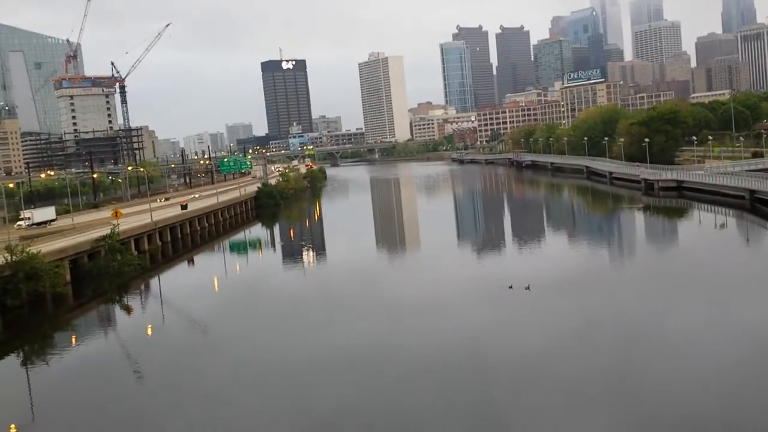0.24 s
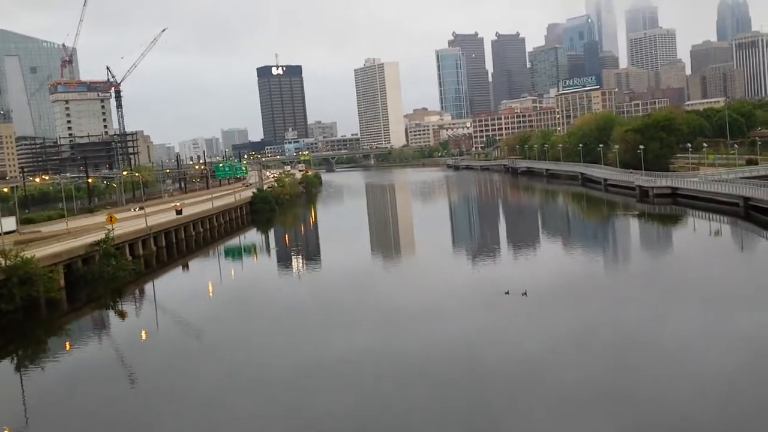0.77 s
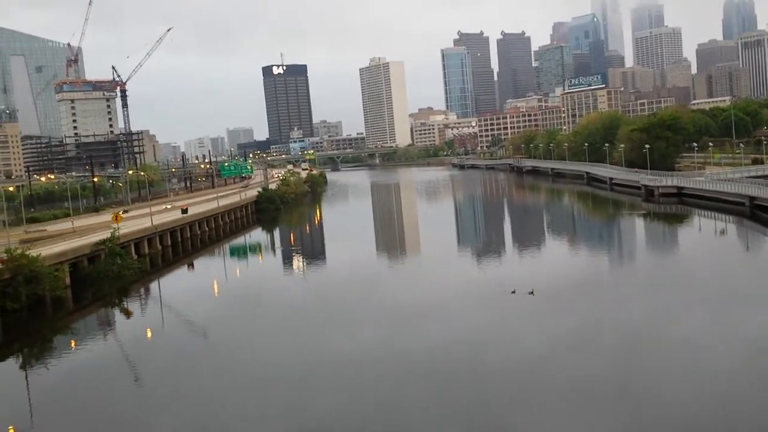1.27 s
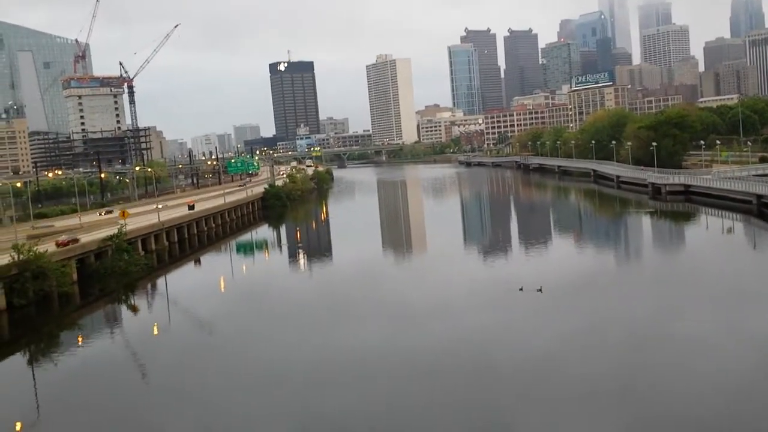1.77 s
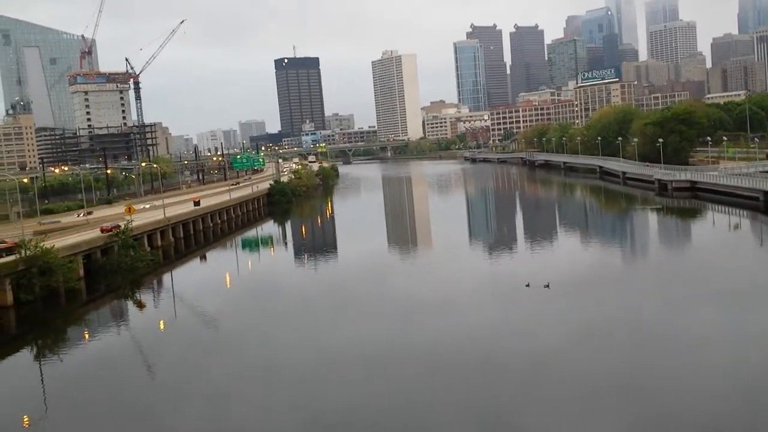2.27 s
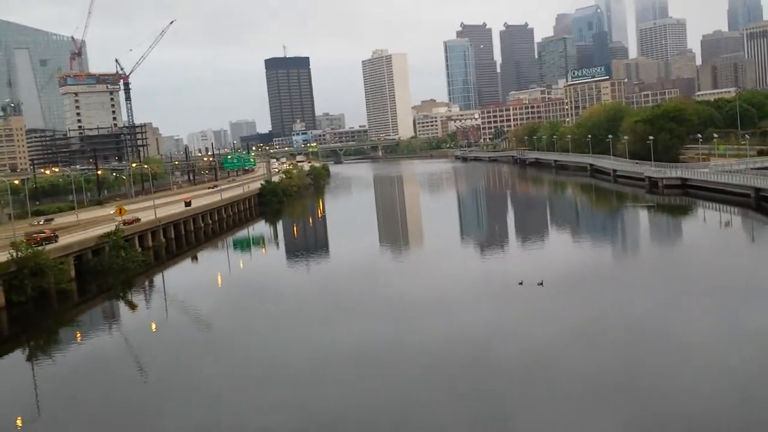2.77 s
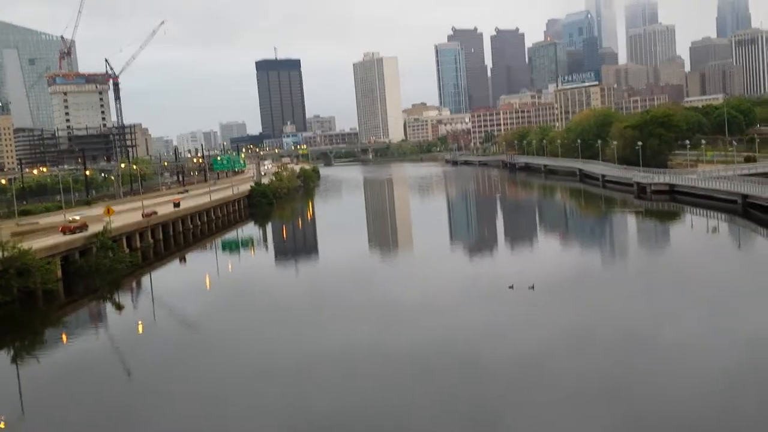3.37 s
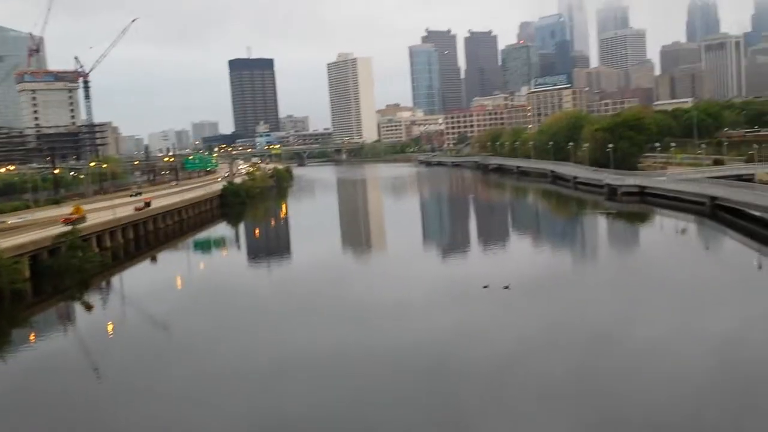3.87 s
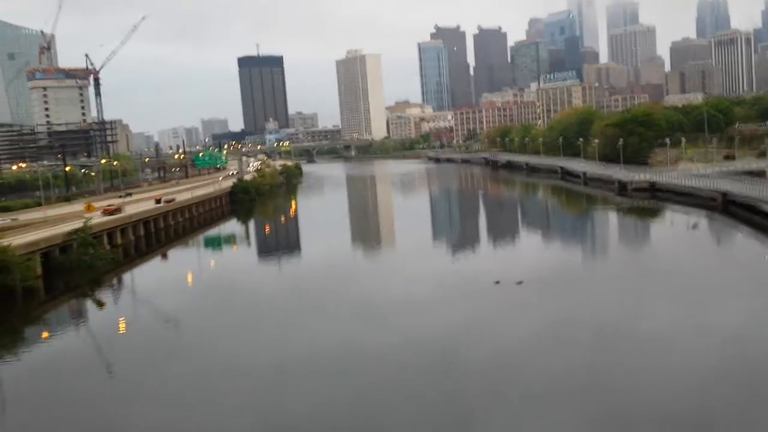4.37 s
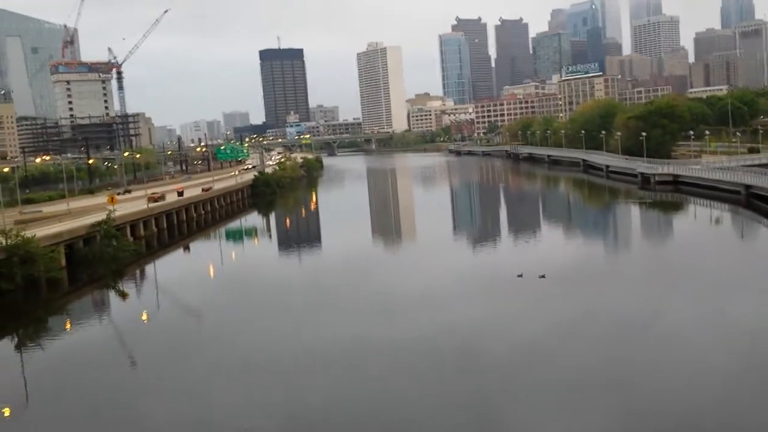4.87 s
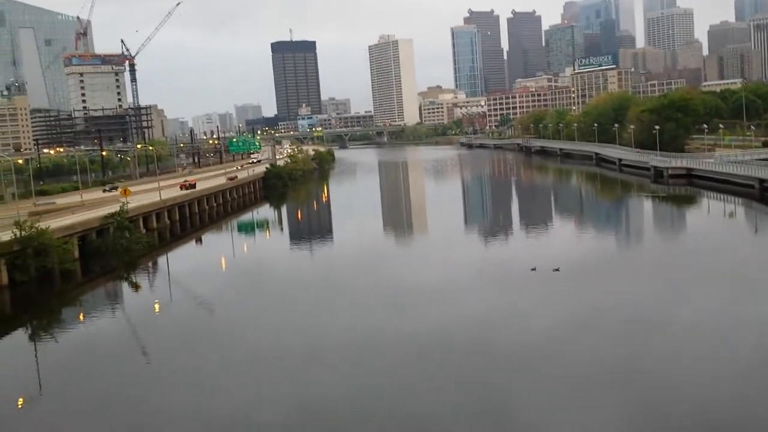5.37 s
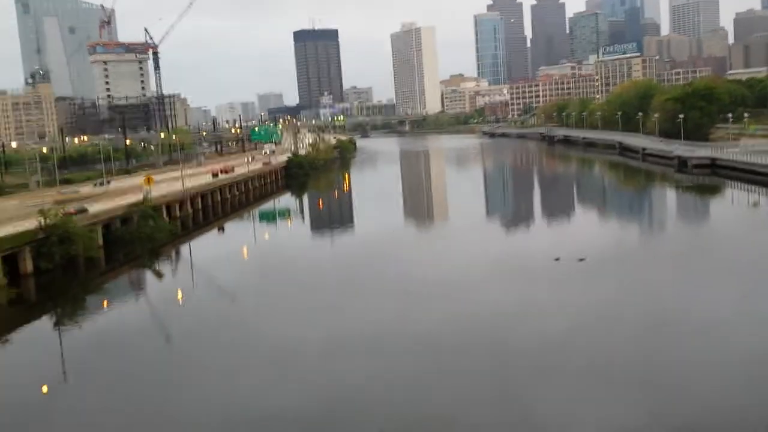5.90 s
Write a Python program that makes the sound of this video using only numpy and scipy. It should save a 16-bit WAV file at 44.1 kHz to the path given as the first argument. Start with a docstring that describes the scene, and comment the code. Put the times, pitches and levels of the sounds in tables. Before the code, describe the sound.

Steady roar and low rumble of highway traffic beside a river, a truck passing early, wet tyre hiss fading, axles thudding on a joint.

```python
"""On a bridge above a busy riverside highway, two microphone ports 13 cm apart. From the start, shaped noise
makes the tyre roar, engine rumble and droning resonances, while wet hiss sinks in surges. A truck is closest
at 1 s, its noise falling with distance; whining treads and engine notes are gliding tones, the whines gone
by about 3 s. Throughout, axles knock on an expansion joint: thud, ring and faint wash, mostly in pairs.
After 4 s a few thin squeaks, short wavering tones, come from far off."""
import sys
import numpy as np
from scipy import signal
from scipy.fft import rfft, irfft, next_fast_len
from scipy.io import wavfile
from scipy.ndimage import uniform_filter1d

SR = 44100
rng = np.random.default_rng(int(sys.argv[2]) if len(sys.argv) > 2 else 0)


def log_audio(samples):
    """Write samples as a 16-bit WAV file to the path given in sys.argv[1]."""
    # one column per channel
    frames = np.atleast_2d(samples).T
    # limit to full scale, then quantise
    limited = np.clip(frames, -1, 1)
    pcm = np.round(limited * 32767).astype(np.int16)
    wavfile.write(sys.argv[1], SR, pcm)


N = 270774
TIME = np.arange(N) / SR


# Spectrum of the tyre roar up on the bridge. Each row: frequency in Hz, relative density in dB.
ROAR_SPECTRUM = [(200, -16), (380, -4), (470, -2.5), (620, -3), (800, 1.2), (880, -1), (1000, 1),
                 (1450, -1.5), (1660, -8.5), (1850, -6.5), (2200, -9.5), (3000, -17.5), (4200, -25.5),
                 (9000, -64.5), (10500, -93)]
# The roar as cars come and go. Each row: time in seconds, level in dB before the overall lift,
# upper part against the lower in dB.
ROAR_COURSE = [(0, -27.5, -7.5), (0.9, -28, -5.5), (2.1, -25.5, -8), (2.6, -25.5, -9.5), (3.3, -25.5, -7.5),
               (4, -27, -6.5), (4.7, -26, -8.5), (5.5, -26, -8.5), (6.14, -27.5, -9)]
# Echo off a hard surface: its delay grows, and its ripple strengthens e-fold in BOUNCE_GROWTH_S.
BOUNCE_MS, BOUNCE_MS_PER_S, BOUNCE_END_DB, BOUNCE_GROWTH_S = 3.17, 0.15, 3, 1.9


def tyre_roar(lift_db=2.0, patchy_db=0.5, flutter_db=0.5, usual_upper_db=-7.5, banded_db=1.0,
              right_db=0.4, comb_top_hz=1500):
    """Tread noise of all lanes; an echo combs it, and its upper part changes with the mix of cars."""
    t, hz = grid(size=2048)
    upper = read([(1300, 0), (2000, 1)], hz)
    field_db = read(ROAR_SPECTRUM, hz) + upper * (follow(ROAR_COURSE, t)[1] - usual_upper_db)
    # the echo ripples the spectrum, less at the bottom and hardly above comb_top_hz
    delay_ms = BOUNCE_MS + BOUNCE_MS_PER_S * t
    comb = np.cos(2 * np.pi * hz * delay_ms / 1000)
    depth_db = BOUNCE_END_DB * np.exp((t - TIME[-1]) / BOUNCE_GROWTH_S)
    comb_range = read([(400, .3), (700, 1)], hz) * np.exp(-(hz / comb_top_hz) ** 4)
    field_db = field_db + depth_db * comb * comb_range
    field_db = field_db + patchy_db * patches(t, hz, .16, 130) + banded_db * patches(t, hz, 0.88, 70)
    swell_db = follow(ROAR_COURSE, TIME)[0] + flutter_db * wander(22)
    side_db = np.array([[-right_db], [right_db]]) / 2
    return outdoor_noise(field_db, hz, direct=0.39) * gain_of(swell_db + lift_db + side_db)


# Deep rumble of the city and all engines. Each row: frequency in Hz, relative density in dB.
RUMBLE_SPECTRUM = [(20, -60.5), (27, -35), (34, -16), (42, 1.5), (60, -3.5), (75, -3), (100, 0.5),
                   (140, -3), (200, -1.5), (330, -7.5), (450, -8), (800, -70), (2000, -100)]
# heavy vehicles draw away, so the engines fade steadily against the deepest rumble
ENGINE_START_DB, ENGINE_FADE_DB_PER_S = 2.5, 0.88


def engines(level_db=-27.0, patchy_db=0.35):
    """The blended rumble of many engines; its deepest part, from the whole city, stays steady."""
    t, hz = grid(size=8192)
    nearby = read([(55, 0), (110, 1)], hz)
    engine_db = ENGINE_START_DB - ENGINE_FADE_DB_PER_S * t
    field_db = read(RUMBLE_SPECTRUM, hz) + nearby * engine_db + patchy_db * patches(t, hz, .25, 40)
    return outdoor_noise(field_db, hz, direct=0.23) * gain_of(level_db)


def resonance(hz, centre_hz, width_hz, db):
    """The power spectrum of one resonance."""
    return gain_of(db) ** 2 / (1 + 2 * ((hz - centre_hz) / width_hz) ** 2) ** 2


# Steady resonances of the heavy vehicles. Each row: centre in Hz, width in Hz, relative level in dB.
DRONE_RESONANCES = [(246.6, 53, 0), (294, 43, -10), (191, 14, -10)]
# Vehicles that boom beside the drone as they pass. Each row: time of the top in seconds, centre in Hz,
# width in Hz, relative level in dB, bell spread in seconds.
PASSING_BOOMS = [(0.7, 289, 27.8, 0.5, 0.25), (1.3, 290, 50, -2.5, .3), (1.947, 310, 54.7, -1.5, 0.4),
                 (2.1, 169, 28, -2, 0.5), (3.397, 316, 44.8, -2, .3), (5.898, 180, 30, 0.5, 0.31)]
# Swells and lulls of the drone. Each row: middle in seconds, change in dB, bell spread in seconds.
DRONE_SWELLS = [(1.55, 0, 0.2), (2.65, 1, 0.25), (3.55, -1.5, 0.17), (4.1, -6.5, 0.074), (4.35, 6, 0.055),
                (4.95, 6, 0.044), (5.25, 5.5, 0.048), (5.72, 4, 0.15)]
# the heavy vehicles draw away
DRONE_START_DB, DRONE_FADE_DB_PER_S = -26.5, 1.32


def drone(patchy_db=0.3):
    """Heavy vehicles boom in a few narrow resonances that swell in turn."""
    t, hz = grid(size=8192)
    power = sum(resonance(hz, *row) for row in DRONE_RESONANCES)
    for s, centre_hz, width_hz, db, spread_s in PASSING_BOOMS:
        power = power + resonance(hz, centre_hz, width_hz, db) * bell(t, s, spread_s) ** 2
    field_db = 10 * np.log10(power) + patchy_db * patches(t, hz, .25, 20)
    level_db = DRONE_START_DB - DRONE_FADE_DB_PER_S * TIME + swells(DRONE_SWELLS, TIME)
    return outdoor_noise(field_db, hz, direct=0.12) * gain_of(level_db)


# Engine notes that stand out of the drone. Each row: time of the top in seconds, pitch there in Hz,
# level in dB before flutter, bell spread in seconds, glide in Hz per second.
NOTES = [(0.16, 237, -27, 0.11, -39), (0.3, 192.5, -30.5, 0.12, -64.5), (0.46, 284, -30, 0.087, -60),
         (0.7, 250, -28, 0.065, -0.5), (.86, 289, -30, 0.055, -49.5), (1.15, 250.5, -27.5, .12, -7),
         (1.62, 253.8, -32, 0.13, -1.5), (1.92, 271, -29.5, 0.1, -1.5), (2.24, 249, -29, 0.082, -14.5),
         (2.68, 240.5, -31.5, 0.17, 9.5), (4.92, 243, -28.5, 0.089, 21)]


def engine_notes():
    """Single engines hum through the drone for a moment, their pitch sliding as they pass."""
    return sung(NOTES, waver=.014, waver_hz=24, flutter_db=1.2)


# Tyres and body of the near truck. Each row: frequency in Hz, relative density in dB.
TRUCK_SPECTRUM = [(150, -12), (260, -19), (320, 9.5), (380, -6), (650, 2), (900, 1), (1050, 7), (1210, 5.5),
                  (1330, 2), (1560, 3), (1720, -3.5), (2500, -11), (4000, -28), (10500, -85)]
# when it is closest, its level then, and the times from and to half power
TRUCK_CLOSEST_S, TRUCK_DB, TRUCK_RISE_S, TRUCK_FALL_S = 1, -24, 1, 0.21


def truck(patchy_db=2.0):
    """One truck close by roars for a moment and draws away; its sound falls with distance."""
    t, hz = grid(size=2048)
    field_db = read(TRUCK_SPECTRUM, hz) + patchy_db * patches(t, hz, .15, 60)
    since = TIME - TRUCK_CLOSEST_S
    distance = np.hypot(1, since / np.where(since < 0, TRUCK_RISE_S, TRUCK_FALL_S))  # 1 when closest
    return outdoor_noise(field_db, hz, direct=0.25) * gain_of(TRUCK_DB) / distance


# Singing tread. Each row: time of the top in seconds, pitch there in Hz, level in dB before flutter,
# bell spread in seconds, glide in Hz per second.
TREAD_TONES = [(0.27, 1025, -30.5, 0.067, 97), (0.85, 771, -28.5, 0.11, -21), (0.9, 968, -29, .04, 0),
               (0.92, 1064, -35, 0.06, -1), (1.17, 763, -31, 0.1, 7), (2.8, 835, -35, 0.093, -3)]


def tread_whine():
    """Regular tread blocks sing for a moment, unsteadily."""
    return sung(TREAD_TONES, waver=.018, waver_hz=40, flutter_db=2.5)


# Hiss of damp asphalt. Each row: frequency in Hz, relative density in dB.
HISS_SPECTRUM = [(1800, -23), (3000, -3.5), (3600, -4), (4200, -1), (5200, -1), (5900, 1), (6500, 3.5),
                 (7200, 4), (7600, -1), (8000, -3.5), (9000, -13), (9700, -25), (10300, -47.5),
                 (10600, -87)]
# Side the hiss comes from. Each row: frequency in Hz, left minus right port in dB.
HISS_SIDE = [(2500, -1.5), (3800, 0.5), (4800, -4.5), (5900, -2.5), (6700, -4), (7400, -7.5), (8300, -5.5),
             (9600, -17.5)]
# Colour of the hiss. Each row: time in seconds, its lower part against the top in dB.
HISS_LOWER = [(0, -4), (0.6, -1.5), (1.3, -1), (1.8, 1), (2.3, 0), (3.3, -1), (4.2, -2), (5.4, 1.5),
              (6.14, 0)]
# Slow swells and lulls. Each row: middle in seconds, change in dB, bell spread in seconds.
HISS_SWELLS = [(0.52, 2, 0.38), (2.13, -2, 0.089), (2.78, -1, 0.043), (3.7, -1, 0.15)]
# Brief surges of spray. Each row: time of the top in seconds, rise in dB, bell spread in seconds,
# extra rise of the lower part in dB; both rises are weighted over frequency.
SPRAY_SURGES = [(0.328, 4.5, 0.014, -3.5), (0.514, 3.5, 0.025, -2), (0.64, 6.5, 0.007, -2),
                (0.68, 5, 0.015, -5.5), (0.924, 2.5, 0.011, 2), (0.99, 4.5, 0.012, -2),
                (1.075, 3.5, 0.019, 0.5), (1.145, 3.5, 0.0091, 0), (1.243, 5, 0.0076, -2.5),
                (1.33, 5.5, 0.015, -2), (1.52, 2, 0.02, 3.5), (1.72, 3.5, 0.026, 5.5),
                (1.872, 4.5, 0.021, -1.5), (1.986, 2.5, 0.017, -0.5), (2.353, 4.5, 0.029, 2),
                (2.531, 4, 0.014, 1.5), (2.888, 0.5, 0.024, -0.5), (3.007, 2.5, 0.026, 0.5),
                (3.15, 2.5, 0.021, 0), (4.212, 3.5, 0.067, -1), (4.432, 2, 0.022, 0.5),
                (4.652, 2.5, .025, -4.5), (4.907, 1, 0.017, -1), (5.062, 3, 0.017, -5.5),
                (5.229, 3.5, 0.02, -5)]
# the hiss sinks steadily as the wet lanes empty
HISS_START_DB, HISS_FADE_DB_PER_S = -29.56, 1.98


def tyre_hiss(patchy_db=1.0, flutter_db=0.77, usual_lower_db=-3.0, banded_db=0.5, spatter_db=0.2):
    """Spray hisses off the tyres in surges, spattering, and fluttering on its way through the air."""
    t, hz = grid(size=512)
    lower = read([(5400, 1), (6500, 0)], hz)
    field_db = read(HISS_SPECTRUM, hz) + lower * (follow(HISS_LOWER, t)[0] - usual_lower_db)
    spray = read([(2600, .15), (4300, 1)], hz)
    swish = read([(3600, .3), (5200, 1), (6600, 0)], hz)
    for s, rise_db, spread_s, lower_db in SPRAY_SURGES:
        field_db = field_db + spray * (rise_db + swish * lower_db) * bell(t, s, spread_s)
    field_db = field_db + patchy_db * patches(t, hz, 0.052, 800) + banded_db * patches(t, hz, 0.65, 200)
    hiss = outdoor_noise(field_db, hz, direct=0.15)
    side_db = read(HISS_SIDE, np.fft.rfftfreq(N, 1 / SR)) / 2
    hiss = irfft(rfft(hiss) * gain_of([side_db, -side_db]), N)
    level_db = HISS_START_DB - HISS_FADE_DB_PER_S * TIME + swells(HISS_SWELLS, TIME)
    return hiss * gain_of(level_db + flutter_db * wander(58) + spatter_db * wander(400))


# Axles on the joint. Each row: time of the peak in seconds, level in dB, centre in Hz,
# bell spread in seconds, ringing share of the power from 0 to 1.
AXLE_KNOCKS = [(0.075, -22, 622, 0.012, 0.3), (1.182, -24, 531, 0.012, 0.94),
               (1.345, -19, 557, 0.014, 0.74), (2.375, -20.5, 270, .005, 0.4),
               (2.424, -21, 440, 0.012, 0.35), (2.584, -15, 510, 0.0053, 0.44),
               (2.606, -20, 280, 0.0065, 0.4), (2.749, -22, 466, 0.0052, 0.4),
               (3.321, -23.5, 660, 0.0065, 0.03), (3.68, -25, 517, 0.016, 0.7),
               (3.852, -21.5, 490, 0.0076, 0.7), (4.695, -23, 474, 0.0093, 0.4),
               (4.846, -23.5, 418, 0.0072, 0.6), (4.857, -17.5, 690, 0.004, 0.35),
               (5.868, -22.5, 450, 0.0073, 0.1), (6.003, -23, 458, 0.0066, 0.1)]


def joint_knocks(echo_db=-19, echo_t60=0.58, dull_hz=900):
    """Each axle strikes the joint: a dull thud, a short ring and a faint wash off the banks."""
    out, lead_s, thud_octaves = np.zeros((2, N)), .05, .45
    t = np.arange(SR // 2) / SR - lead_s
    hz = np.fft.rfftfreq(len(t), 1 / SR)
    for s, db, ring_hz, spread_s, ringing in AXLE_KNOCKS:
        octaves = np.log2((hz + 1) / ring_hz) / thud_octaves
        band = np.exp(-.5 * octaves ** 2) / (1 + (hz / dull_hz) ** 8)
        wash = evened(irfft(rfft(rng.standard_normal((2, len(t)))) * band, len(t)))
        contact = bell(t, 0, spread_s)
        # the deck spreads the blow in time: each frequency arrives at its own moment
        arrival_s = lead_s + .65 * spread_s * np.sin(octaves + 2 * np.pi * rng.random())
        turns = np.cumsum(arrival_s) * hz[1] + rng.random()
        thud = evened(irfft(band * np.exp(-2j * np.pi * turns), len(t)))
        ring = evened(np.sin(2 * np.pi * (ring_hz * t + rng.random())) * contact)
        blow = evened(np.sqrt(ringing) * ring + np.sqrt(1 - ringing) * thud)
        blow = blow * np.sqrt(np.mean(contact ** 2))
        onset = (1 + np.tanh(t / spread_s)) / 2
        echo = gain_of(echo_db) * wash * onset * np.exp(-np.log(1000) * abs(t) / echo_t60)
        add(out, s - lead_s, gain_of(db) * (blow + echo))
    return out


# Thin squeaks far off. Each row: start in seconds, length in seconds, pitch in Hz,
# level in dB before the side levels.
FAR_SQUEAKS = [(4.175, .04, 5900, -37), (4.165, .035, 5270, -42), (4.19, .14, 3079, -44),
               (4.24, .1, 3391, -42), (4.788, .016, 5840, -39), (4.806, .052, 5860, -34.5),
               (4.878, .02, 5860, -37.5), (4.875, .048, 6570, -39.5), (5.07, .025, 6020, -41),
               (5.33, .036, 5620, -37.5), (5.418, .026, 5590, -38.5)]


def squeaks(waver=.004, flutter_db=3.0):
    """Short, rough high tones, a little to the right."""
    out, side_db = np.zeros((2, N)), np.array([[-6], [-2]])  # left, right
    for s, length_s, hz, db in FAR_SQUEAKS:
        pitch = hz * (1 + waver * wander(300)[:round(length_s * SR)])
        roughness = evened(gain_of(flutter_db * wander(150)[:len(pitch)]))
        swell = signal.windows.tukey(len(pitch), .4) * roughness
        tone = np.sqrt(2) * np.sin(2 * np.pi * np.cumsum(pitch) / SR)
        add(out, s, gain_of(db + side_db) * swell * tone)
    return out


def sung(rows, waver, waver_hz, flutter_db):
    """Tones that swell and fade, gliding and wavering a little."""
    out = np.zeros(N)
    for s, hz, db, spread_s, glide in rows:
        pitch = (hz + glide * (TIME - s)) * (1 + waver * wander(waver_hz))
        tone = np.sqrt(2) * np.sin(2 * np.pi * np.cumsum(pitch) / SR)
        out += tone * bell(TIME, s, spread_s) * gain_of(db + flutter_db * wander(22))
    return out


# Bearing of the loudest traffic, first the truck, then the lanes further right.
# Each row: time in seconds, how much later direct sound reaches the left port in ms.
LANE_LAG = [(0, 0.36), (1.5, 0.22), (2.2, 0.43), (6.14, 0.4)]
PORTS_M = 0.13  # microphone spacing
PORT_MATCH = 0.98  # scales how alike the two ports are, 0-1


def outdoor_noise(field_db, hz, direct):
    """Noise at two ports: part comes straight from the lanes, the rest from all round. Mid rms is 1."""
    diffuse = np.sinc(2 * hz * PORTS_M / 343)  # likeness of sound from all round; 343 m/s
    size = 2 * (len(hz) - 1)
    lag_ms = follow(LANE_LAG, grid(size)[0])[0]
    lag = np.exp(-2j * np.pi * hz * lag_ms / 1000)
    same = PORT_MATCH * (direct * lag + (1 - direct) * diffuse)
    shape = (2,) + field_db.shape
    a, b = rng.standard_normal(shape) + 1j * rng.standard_normal(shape)
    left = same * a + np.sqrt(np.maximum(1 - abs(same) ** 2, 0)) * b
    z = np.array([left, a]) * gain_of(field_db)
    x = signal.istft(z, nperseg=size, noverlap=size * 3 // 4, time_axis=1, freq_axis=2)[1][:, :N]
    return x / np.std(x.mean(0))


def patches(t, hz, long_s, wide_hz):
    """Random patches over time and frequency, as moving air focuses distant sound; rms 1."""
    field = rng.standard_normal((len(t), len(hz)))
    field = uniform_filter1d(field, max(round(long_s / t[1, 0]), 1), axis=0)
    return evened(uniform_filter1d(field, max(round(wide_hz / hz[1]), 1), axis=1))


def wander(rate_hz):
    """Slow chance of rms 1, up to about the given rate."""
    size = next_fast_len(N, real=True)
    hz = np.fft.rfftfreq(size, 1 / SR)
    slow = rfft(rng.standard_normal(size)) * np.exp(-(hz / rate_hz) ** 2)
    return evened(irfft(slow, size)[:N])


def bell(t, s, spread_s):
    """A smooth rise to 1 at s seconds and a like fall."""
    return np.exp(-.5 * ((t - s) / spread_s) ** 2)


def swells(rows, t):
    """The summed dB of passing swells at the times t."""
    return sum(db * bell(t, s, spread_s) for s, db, spread_s in rows)


def grid(size):
    """Frame times (a column) and bin frequencies of short-time spectra."""
    hop = size // 4
    return np.arange(N // hop + 2)[:, None] * hop / SR, np.fft.rfftfreq(size, 1 / SR)


def gain_of(db):
    """Decibels to amplitude."""
    return 10 ** (np.asarray(db) / 20)


def evened(x):
    """Scales to rms 1."""
    return x / np.sqrt(np.mean(abs(x) ** 2) + 1e-20)


def read(points, hz):
    """A spectrum's value, on a log-frequency axis."""
    f, value = np.transpose(points)
    return np.interp(np.log(hz + 1), np.log(f + 1), value)


def follow(rows, t):
    """The columns of a curve at the times t."""
    s, *columns = np.transpose(rows)
    return [np.interp(t, s, c) for c in columns]


def add(mix, s, sound):
    """Mixes a stereo sound in at s seconds."""
    part = mix[:, max(round(s * SR), 0):][:, :sound.shape[-1]]
    part += sound[..., :part.shape[1]]


def scene():
    """All the traffic together, as it reaches the bridge."""
    traffic = tyre_roar() + engines() + drone() + engine_notes() + truck()
    return traffic + tread_whine() + tyre_hiss() + joint_knocks() + squeaks()


def record(dry):
    """The recorder's steep upper band limit."""
    edge_hz = 10300
    lowpass = signal.firwin(511, edge_hz, window=("kaiser", 9), fs=SR)
    return signal.oaconvolve(dry, lowpass[None], "same")


dry = scene()
out = record(dry)
log_audio(out)
```